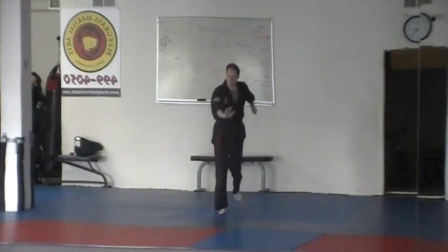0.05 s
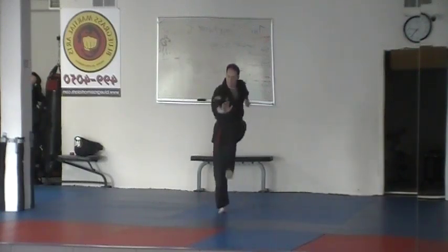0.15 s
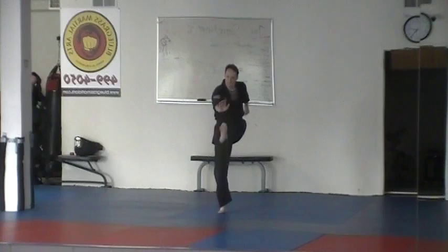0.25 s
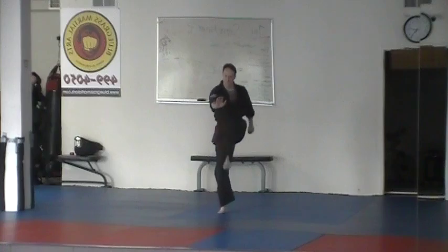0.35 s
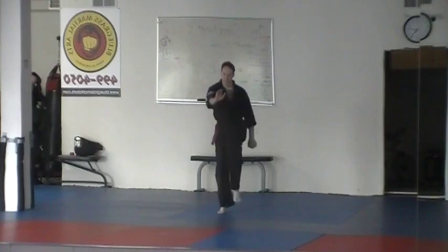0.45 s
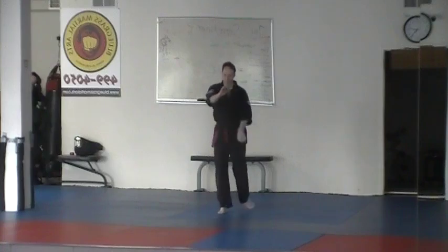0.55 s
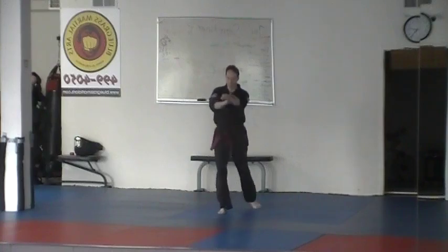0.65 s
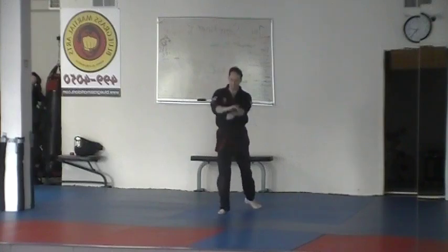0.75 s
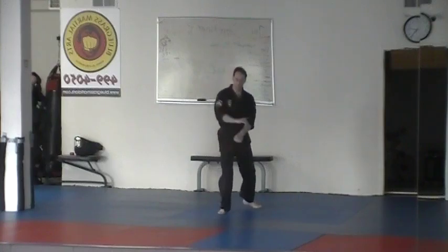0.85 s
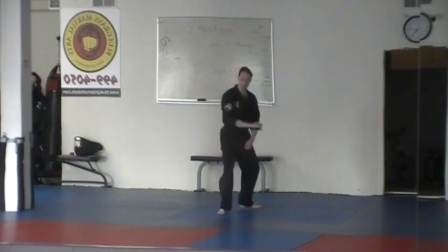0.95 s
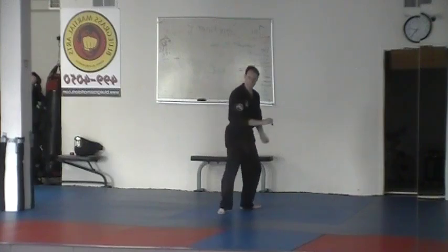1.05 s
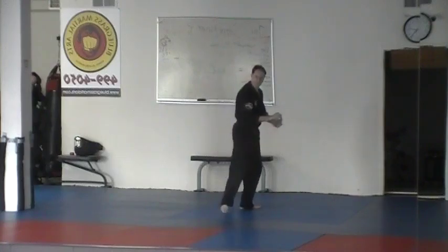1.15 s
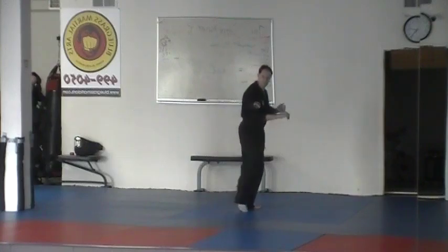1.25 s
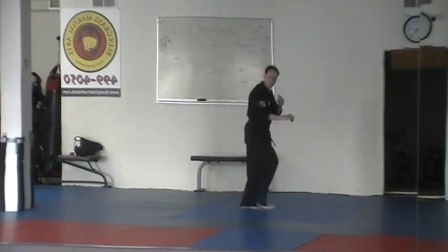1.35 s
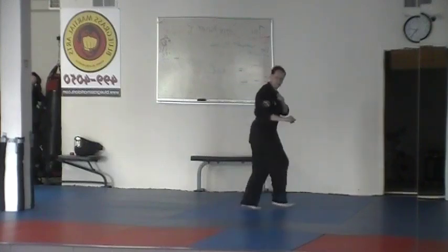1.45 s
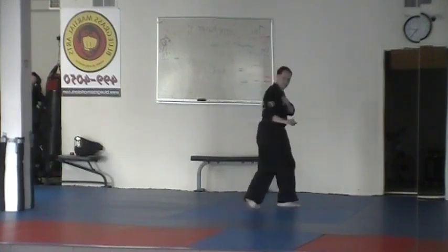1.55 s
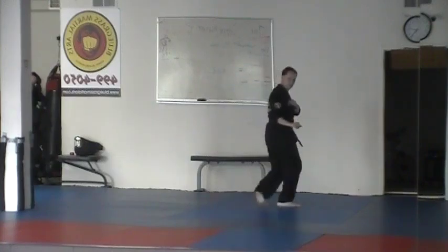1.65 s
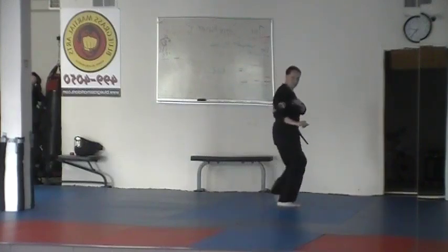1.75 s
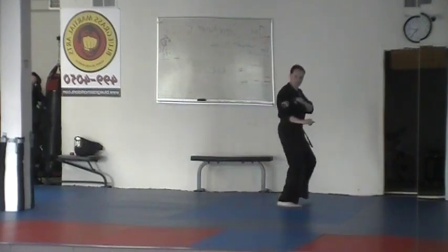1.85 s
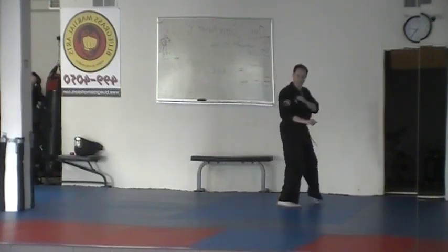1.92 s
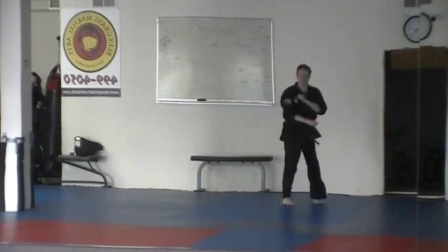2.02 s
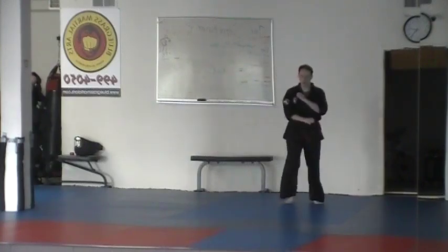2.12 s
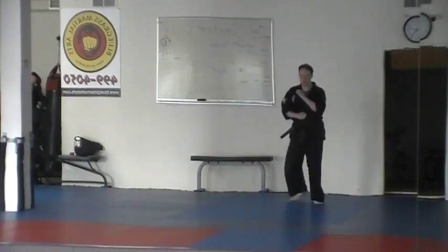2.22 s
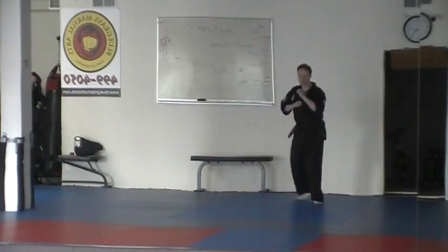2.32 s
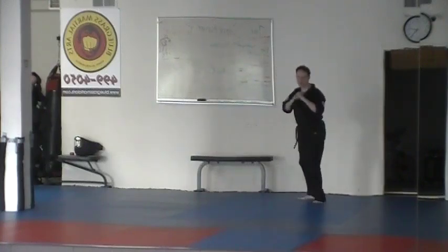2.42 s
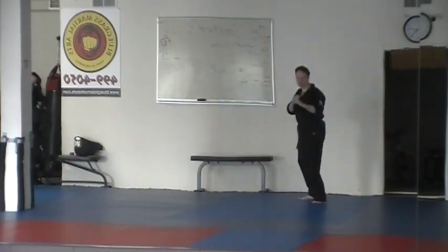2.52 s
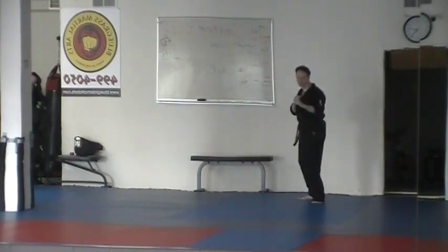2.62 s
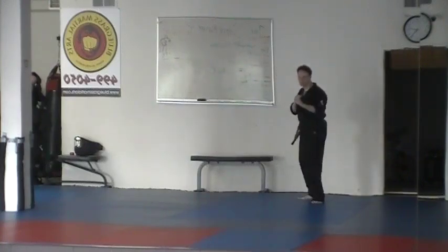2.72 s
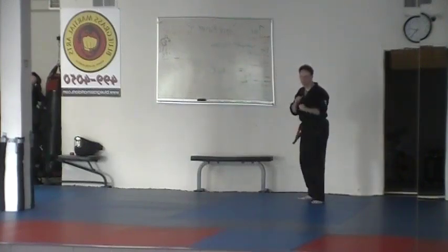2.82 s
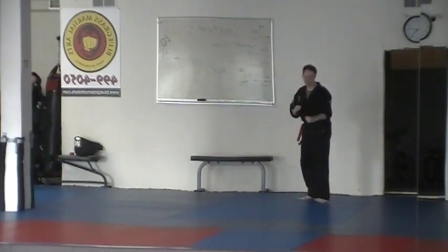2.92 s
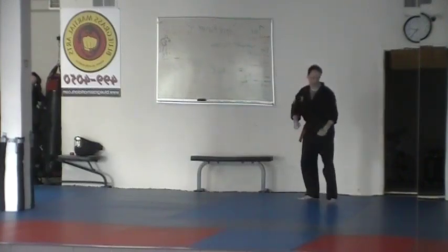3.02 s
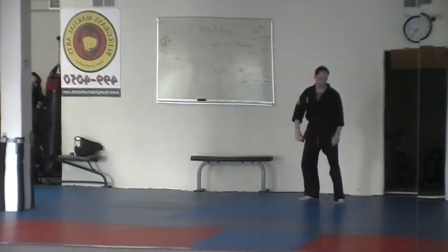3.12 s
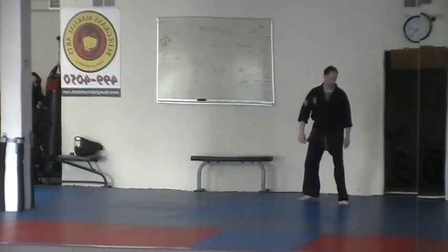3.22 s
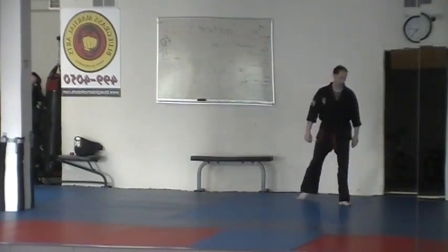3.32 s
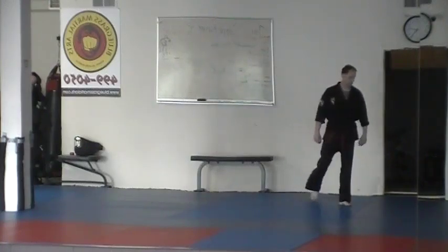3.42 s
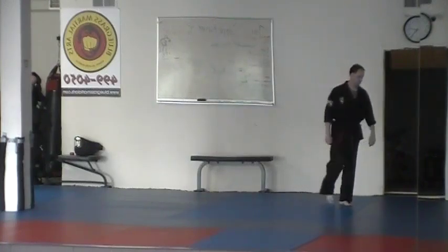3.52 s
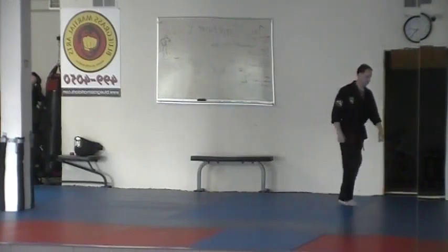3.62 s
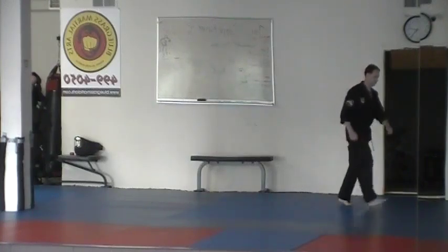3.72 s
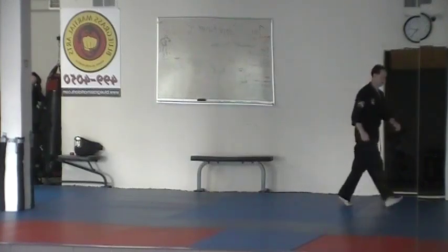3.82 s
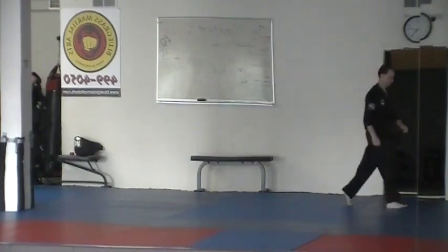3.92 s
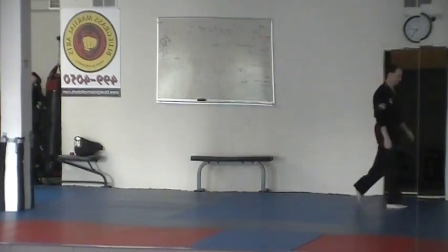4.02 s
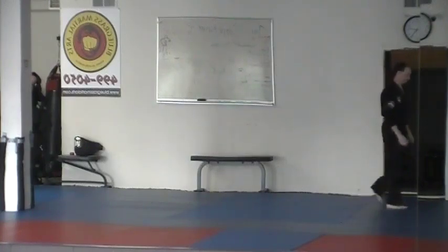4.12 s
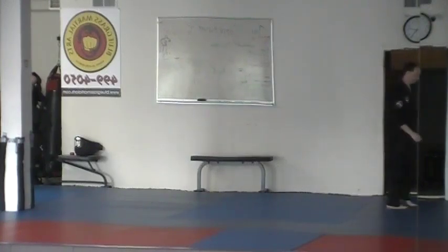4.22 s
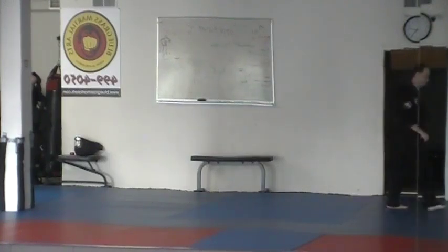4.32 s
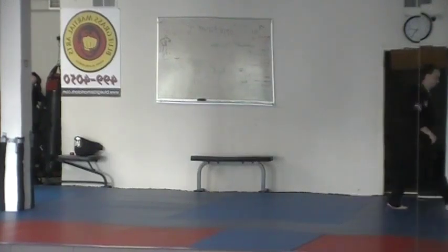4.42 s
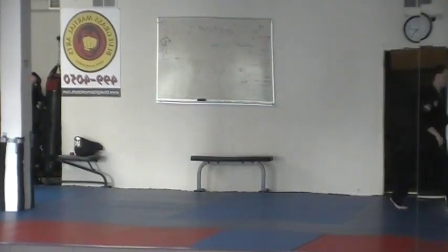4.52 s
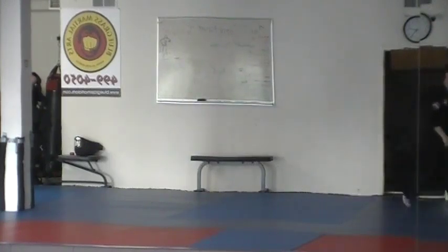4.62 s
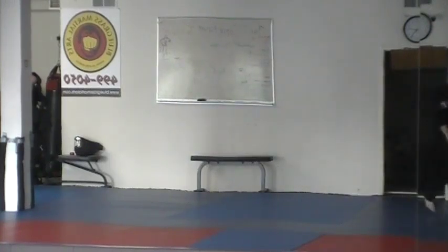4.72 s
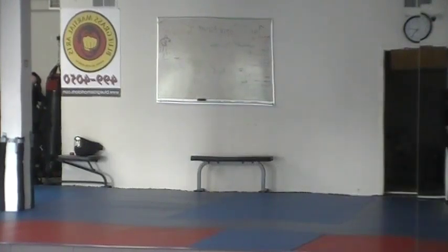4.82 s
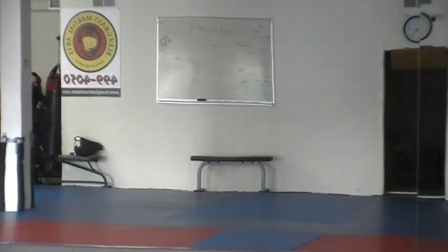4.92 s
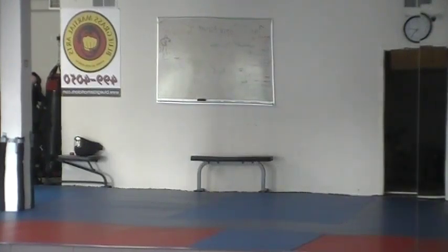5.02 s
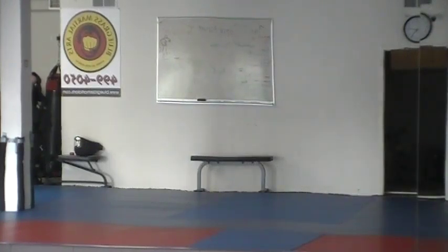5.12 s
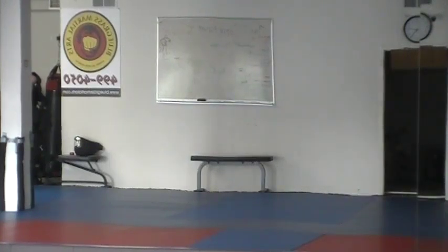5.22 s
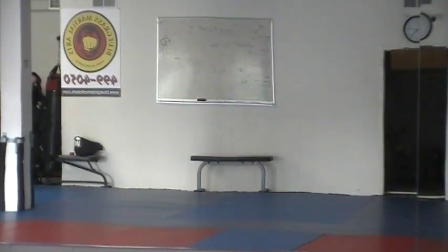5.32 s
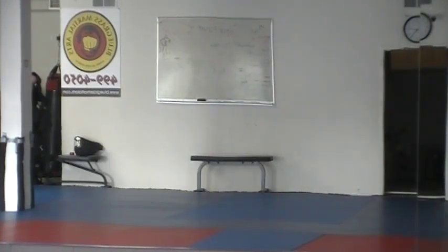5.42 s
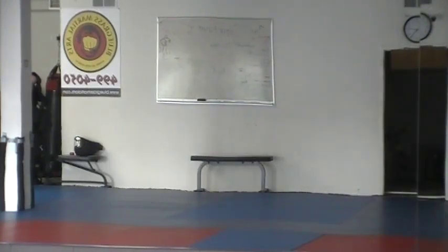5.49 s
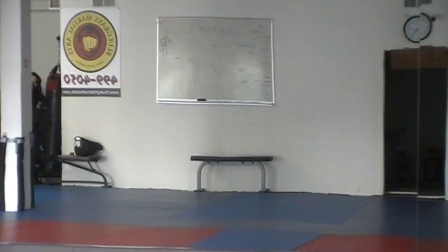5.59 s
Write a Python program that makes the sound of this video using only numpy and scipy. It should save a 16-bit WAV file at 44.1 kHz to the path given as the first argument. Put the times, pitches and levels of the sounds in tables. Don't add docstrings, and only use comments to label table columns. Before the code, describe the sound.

A barefoot fighter moves on foam mats in a reverberant hard-walled hall, far from a small, bass-light microphone. Soft thuds and faint scuffs lead to one very sharp slap, which bounces off the walls. Bright, hissing sole slides follow, with brief squeaks and cloth flaps, then a second strong double scuff. Sparse light steps, ticks and peeling skin trail off over steady ventilation hum.

```python
import sys
import numpy as np
from scipy import signal
from scipy.io import wavfile
from scipy.ndimage import uniform_filter1d

SR = 44100
rng = np.random.default_rng(int(sys.argv[2]) if len(sys.argv) > 2 else 0)


def level_to_linear(level):
    exponent = np.asarray(level, float) / 20
    return 10 ** exponent


def store_wav(level_fs):
    pcm = np.round(np.clip(np.atleast_2d(level_fs), -1, 1) * 32767)
    wavfile.write(sys.argv[1], SR, pcm.T.astype(np.int16))


N = 249284


def evened(x):
    return x / np.sqrt(np.mean(x ** 2) + 1e-20)


def smoothed_twice(x, first, second, axes=(0, 0)):
    return uniform_filter1d(uniform_filter1d(x, first, axes[0]), second, axes[1])


def highpass(x, order, hz):
    return signal.sosfilt(signal.butter(order, hz, "high", fs=SR, output="sos"), x)


def read(points, hz, column=1):
    points = np.array(points)
    return np.interp(np.log(hz + 1), np.log(points[:, 0] + 1), points[:, column])


def add(mix, s, sound):
    part = mix[round(s * SR):][:len(sound)]
    part += sound[:len(part)]


def colour(x, points):
    log_gain = np.log(level_to_linear(read(points, abs(np.fft.fftfreq(4096, 1 / SR)))))
    taps = np.fft.ifft(np.exp(np.conj(signal.hilbert(log_gain)))).real[:2048]
    return signal.oaconvolve(x, taps / np.linalg.norm(taps))[:N]


def resonate(x, hz, width):
    turn = np.exp(2j * np.pi * hz * np.arange(len(x)) / SR)
    r = np.exp(-np.pi * width / SR)
    return 2 * (turn * signal.lfilter([1 - r], [1, -r], x / turn)).real


def grit(spread_db, flicker_db):
    slips = rng.standard_normal(N) * level_to_linear(spread_db * np.minimum(rng.exponential(1, N), 5))
    flicker = evened(smoothed_twice(rng.standard_normal(N), 200, 200))
    return evened(slips * level_to_linear(flicker_db * flicker))


def swells(rows, follows=1, offsets_db=0):
    swell_db = 20
    touch, lift = 0.8, 1.44
    t, power = np.arange(0, N, 32) / SR, 0
    for (s, db, rise, fall, _), offset_db in zip(rows, offsets_db + np.zeros(len(rows))):
        before = t < s
        away = np.where(before, (s - t) / max(rise, .002), (t - s) / max(fall, .002))
        off_mat = np.maximum(away - np.where(before, touch, lift), 0) * np.where(before, 8, 1.5)
        power = power + level_to_linear(db + offset_db - swell_db * (follows * away + off_mat)) ** 2
    return np.interp(np.arange(N) / SR, t, np.sqrt(power))


def air():
    # (frequency [Hz], level [dB])
    air_spectrum = [(30, -63), (60, -39), (100, -20.5), (160, -16), (230, -11.5), (400, -4.5), (700, -6.5),
                    (1000, -8), (2000, -10), (3000, -14.5), (6000, -18), (10000, -18), (13000, -22),
                    (16000, -29.5)]
    # (frequency [Hz], level [dB], width [Hz])
    fan_tones = [(119.6, -82.5, 4.4), (204.5, -78, 6), (238.4, -72, 22), (396.2, -68, 2), (791, -80, 18),
                 (835, -71.5, 6.5), (966, -70, 1.1)]
    hz = np.fft.rfftfreq(1024, 1 / SR)
    a, b, patches = rng.standard_normal((N // 256 + 5, 513, 3)).T
    patches = evened(smoothed_twice(patches, 12, 14, (0, 1)))
    z = (a + 1j * b) * level_to_linear(read(air_spectrum, hz)[:, None] + 1.37 * patches)
    out = level_to_linear(-56.5) * evened(signal.istft(z, nperseg=1024, noverlap=768)[1][:N])
    noise = rng.standard_normal(N)
    for hz, db, width in fan_tones:
        steady = 2.6 * np.sin(2 * np.pi * hz * np.arange(N) / SR)
        out += level_to_linear(db) * evened(evened(resonate(noise, hz, width)) + steady)
    return out


def hall(x):
    # (delay [s], level [dB])
    walls = [(.009, -21), (.0108, -23), (.0165, -25), (.0195, -29), (.0255, -27), (.0345, -26),
             (.0395, -27), (.043, -27), (.046, -31), (.058, -27), (.0655, -29), (.076, -33), (.102, -34)]
    # (frequency [Hz], time to fall by 60 dB [s], level [dB])
    fading = [(200, 0.9, -12), (800, 0.25, 1), (1400, 0.8, -8), (3300, 0.88, 1), (5400, 0.86, -3.5),
              (8500, 0.73, 1), (12900, 0.67, -12.5), (16500, 0.52, -9.5)]
    hz, t, z = signal.stft(rng.standard_normal(SR), SR, nperseg=256)
    tail = signal.istft(z * level_to_linear(-60 * t / read(fading, hz)[:, None]), SR, nperseg=256)[1][:SR]
    tail *= np.clip(np.arange(SR) / SR / 0.041, 0, 1) ** 1.2
    tail *= level_to_linear(-14.5) / np.linalg.norm(tail)
    smears = rng.standard_normal((14, 300)) * np.exp(-np.arange(300) / 60.)
    for (s, db), smear in zip(walls, smears):
        add(tail, s, level_to_linear(db + 2.5) * smear / np.linalg.norm(smear))
    return signal.fftconvolve(x, colour(tail, [(f, db) for f, t60, db in fading]))[:N]


def squeaks():
    # (time [s], peak level [dB], slip rate [Hz], length [ms])
    squeak_events = [(.076, -46.5, 2270, 19), (.098, -47, 2040, 17), (.215, -47.5, 1890, 13),
                     (1.616, -41.5, 2926, 4.7), (1.636, -34.5, 2180, 13.6), (1.655, -37, 2260, 9),
                     (1.658, -46.5, 3110, 32), (1.676, -45, 2120, 15), (1.694, -54, 2220, 9.9),
                     (1.637, -40, 4350, 9.9), (1.652, -51, 4330, 8.6), (1.694, -50, 4500, 10),
                     (1.618, -48, 2570, 12), (3.52, -55, 5310, 37), (3.562, -49.5, 5700, 28),
                     (3.925, -51, 2250, 12), (5.485, -56, 2500, 40), (5.5, -52, 8500, 40)]
    out = np.zeros(N)
    for (s, db, hz, length_ms), noise in zip(squeak_events, rng.standard_normal((20, 2000))):
        waver = 1 + 0.03 * evened(uniform_filter1d(noise, 60))[:round(length_ms * SR / 1000)]
        turns = np.cumsum(hz * waver) / SR
        tone = sum(level_to_linear(-9 * k) * np.sin(2 * np.pi * (k + 1) * turns) for k in range(3))
        add(out, s, level_to_linear(db) * tone * np.hanning(len(turns)))
    return out


def thuds():
    # (time [s], peak level [dB], pitch
    # [Hz], decay [ms])
    landings = [(0.11, -35, 713, 8.6), (0.209, -40.5, 514, 13), (1.924, -33.5, 368, 4.4),
                (2.302, -42.5, 434, 27), (2.33, -44, 472, 4.1), (3.349, -40, 386, 5.4),
                (3.907, -38.5, 415, 6.6), (4.1967, -37, 940, 6.3), (4.524, -36, 420, 4.6),
                (4.565, -29.5, 700, 2.6), (5.025, -48, 482, 11), (5.09, -44, 500, 2.7),
                (5.098, -28.5, 448, 3), (5.192, -47.5, 400, 8),
                (.128, -38, 800, 3.3), (.147, -42, 690, 4), (.168, -41.5, 478, 8), (2.345, -52, 385, 8.7),
            (4.53, -29, 1980, 1.9), (4.567, -45, 534, 8.4), (5.089, -29.5, 1810, 2.5),
            (5.098, -38, 1900, 1.5), (5.105, -35, 1680, 2.3), (5.114, -40, 1400, 3.1), (5.13, -54, 522, 11),
            (.222, -42, 565, 10), (4.526, -48, 376, 9)]
    # (strongest [s], rumble level [dB], rise [s], fall [s], flap over rumble [dB])
    shifts = [(0.002, -42, 0.011, 0.01, -6), (.11, -54.5, 0.4, 0.24, 5), (.212, -53, 0.053, 0.12, 2),
              (.43, -69, 0.55, 0.67, 10), (0.641, -55.5, 0.14, .003, 2.5), (1.1, -63.5, 0.24, 0.78, 6.5),
              (1.33, -48, 0.43, 0.3, -6), (1.388, -56.5, 0.081, 0.035, 17), (1.526, -55.5, 0.034, 0.4, 0),
              (1.95, -57, 0.041, 0.17, 3), (2.134, -54.5, 0.21, 0.2, -17), (2.304, -48, .006, 0.19, -18),
              (2.345, -49.5, 0.069, 0.043, -1.5), (2.42, -56, 0.204, 0.099, -0.5),
              (3.36, -59.5, 0.23, 0.34, 0.5), (3.914, -53.5, 0.12, 0.075, -2),
              (4.55, -54.5, 0.038, 0.099, 2), (4.716, -60, 0.068, 0.055, -15),
              (5.1, -50, 0.013, 0.064, 1.5), (5.2, -69, 0.26, 0.16, 10)]
    # (frequency [Hz], level [dB])
    foam = [(80, -44), (200, -28), (290, -6.5), (400, 0.5), (500, -2), (650, -13.5), (1000, -41)]
    # (frequency [Hz], level [dB])
    cloth = [(300, -41.5), (600, -3), (850, -2), (1300, -1), (1800, -3.5), (3000, -19.5)]
    drive = level_to_linear(-2.5) * grit(spread_db=3.5, flicker_db=3.5)
    rumble = drive * swells(shifts)
    flap = drive * swells(shifts, 0.63, np.array(shifts)[:, -1])
    out = colour(rumble, foam) + colour(flap, cloth)
    u = np.arange(4000) / SR
    for (s, db, hz, decay_ms), noise in zip(landings, rng.standard_normal((30, 4000))):
        rough = resonate(resonate(noise, hz * 0.99, 0.89 * hz), hz * 0.99, 0.89 * hz)
        knock = np.cos(2 * np.pi * hz * u) + 0.48 * evened(rough)
        shape = (1 - np.exp(-u / 0.0008)) ** 2 * np.exp(-u * 1000 / max(decay_ms, 1))
        add(out, s - .0015, level_to_linear(db - 3) * knock * shape)
    return highpass(out, 2, 190)


def rubbing():
    # (fastest [s], fizz level [dB], rise
    # [s], fall [s], weight on the sole [dB])
    slides = [(0.002, -47.5, 0.011, 0.46, -5.5), (.226, -48, 0.055, 0.12, -4),
              (.612, -56.5, 0.64, 0.022, -6), (.648, -40.5, 0.028, 0.0069, -5),
              (1.17, -40, .017, 0.28, -15), (1.295, -22, 0.12, 0.26, -22.5),
              (1.37, -30.5, 0.24, 0.25, -6.5), (1.478, -32.5, 0.22, 0.16, -27),
              (1.698, -39, 0.021, 0.03, -7), (1.678, -36, 0.036, .02, -12), (1.966, -52, 0.024, 0.09, -12),
              (2.026, -42, 0.12, 0.01, -11), (2.056, -23.5, 0.019, 0.23, -11.5),
              (2.125, -20, 0.055, 0.1, -16), (2.184, -19.5, 0.15, 0.084, -23.5),
              (2.364, -36.5, 0.053, 0.16, -11),
              (2.884, -56.5, .03, .025, -7), (2.93, -55, 0.026, 0.087, -19),
               (3.38, -42.5, 0.035, 0.19, -10), (3.426, -43, 0.086, 0.059, -28),
               (3.562, -45.5, 0.092, 0.14, -13.5), (4.14, -65, 0.14, 0.2, 3), (3.74, -56, 0.067, .08, -6),
               (3.856, -56, 0.026, 0.034, -11), (3.905, -55, .01, 0.23, -2),
               (4.324, -39, 0.038, 0.077, -22), (4.346, -45, .05, 0.021, -17), (4.4, -53, 0.17, 0.28, -10),
               (4.604, -54.5, 0.011, 0.084, -8), (4.964, -34, 0.018, 0.1, -16.5),
               (5.104, -49.5, 0.028, 0.29, -5.5), (5.25, -56, 0.22, 0.052, -21),
               (5.48, -49, 0.018, 0.041, -4), (5.502, -53, .01, 0.25, -9)]
    # (time [s], peak level [dB], rasp over peak [dB], dull part over peak [dB], length [ms])
    scuffs = [(0.2085, -54, 2, -3, 15), (1.0436, -50, -5, -4, 65), (1.152, -46, -19, -18, 18),
              (1.368, -36, -22, 2, 13), (1.619, -36, -3, -3, 16), (1.638, -34.5, 2.5, 0, 9),
              (1.9218, -42, -6.5, -7.5, 20), (1.961, -39.5, -35, -16, 13), (2.006, -38, -9, -12, 14),
              (2.1309, -19, -2.5, -15, 11), (2.3155, -32, -5, -12.5, 32), (2.416, -43.5, -1, 1, 9.6),
              (2.8735, -56, -13, -4, 15), (2.935, -44, -16, -17, 9.2), (3.523, -57, 8.5, -20, 51),
              (3.555, -55, 6, -24, 20), (4.2192, -43, -8, -4, 7.4), (4.248, -46, -15, -14, 8),
              (4.271, -33.5, -2.5, -8.5, 18), (4.282, -33, -8, -19, 20), (4.9151, -32, -6, -5.5, 21),
              (4.929, -30.5, -8.5, -13, 21), (5.459, -32, -6, -5, 7.5), (5.5015, -37, -16, -20, 6)]
    # (time [s], peak level [dB], rasp
    # over peak [dB], dull part over peak [dB], length [ms])
    ticks_and_peels = [(1.1535, -37, -12, -16, 2), (2.461, -42, -12, -18, 3), (3.0295, -46, -12, -12, .3),
                       (3.2258, -52, 12, 15, .2), (3.3494, -37, -10, -6, .3), (3.8412, -31, -9, -13, .2),
                       (3.9056, -35, -3, 1, .4), (3.917, -37, -5, -12, .4), (4.003, -44, -10, -10, .3),
                       (4.4642, -49, 6, 0, .5), (4.5232, -37, 8, 14, .3), (4.5282, -36, -12, -5, .3),
                       (4.531, -48, 2, 12, .4), (4.538, -49, 6, 6, .4), (4.5585, -43, -8, -10, 1.2),
                       (4.5632, -28, -22, -13, .9), (4.606, -41, -14, -14, .4), (5.029, -54, -6, 8, 1.5),
                       (5.0878, -33.5, -2, -5, 2), (5.0968, -22, -5, -3, .3), (5.105, -43, 2, 3, .6),
                       (5.113, -42, 0, 2, .6), (5.139, -36, -10, -12, .4),
                       (1.371, -43, 0, 17, 2.2), (1.377, -51, 0, 10, 2.2), (2.018, -36, -17, -17, 17),
             (2.04, -35, 0, -12, 16), (2.973, -49.5, -16, -18, 10), (3.21, -54, -14, -18, 5),
             (3.3545, -36, -14, -13, .2), (3.365, -48, -10, -16, 8), (3.522, -50, -10, -20, 20),
             (3.5668, -29, -10, -16, .2), (4.221, -48, -6, -8, 1), (2.1318, -29, -8, -14, 0.56),
             (3.817, -44, -8, -14, .3), (3.843, -42.5, -3.5, -9, 5.2), (3.866, -50, -14, -16, 7),
             (3.884, -46, -10, -16, 8.7), (3.907, -46, -2, -8, 4), (3.919, -49, 4, -10, 5.3),
             (3.948, -50, -8, -16, 5), (4.004, -49.5, -2, -5, 5), (4.025, -51, -10, -16, 3),
             (4.046, -54, -10, -16, 6), (4.549, -47, -17, -15, 1.7), (4.565, -44, -7, -9, 12),
             (4.957, -41, -16, -20, 8), (4.976, -35, -20, -18, 14), (5.002, -44, -14, -22, 12),
             (5.467, -38.5, 0.5, -11, 3), (5.511, -42, -2, -18, 2)]
    # (frequency [Hz], level [dB])
    fizz = [(3000, -56), (5500, -18), (7000, -4), (8500, 6), (10000, 9), (12000, 6), (13500, 0),
            (16000, -10.5), (17000, -20)]
    # (frequency [Hz], level [dB])
    rasp = [(1500, -49.5), (3000, -14.5), (4300, -3), (5500, -1.5), (7000, -2), (9000, -22.5), (13000, -42)]
    # (frequency [Hz], level [dB])
    drag = [(100, -27), (500, -11.5), (900, 1.5), (1500, 8.5), (2300, 14.5), (3500, 11), (4800, -5),
            (8000, -42)]
    rows = slides
    slips = grit(spread_db=2.0, flicker_db=-1.2)
    weight_db = np.array(rows)[:, -1]
    layers = level_to_linear(-3.5) * slips * np.array([
        swells(rows),
        swells(rows, 0.99, -3.5 + 0.4 * weight_db),
        swells(rows, 1, weight_db)])
    u = np.arange(4000) / SR
    bursts = rng.standard_normal((90, 4000))
    for (s, db, rasp_db, dull_db, length_ms), burst in zip(scuffs + ticks_and_peels, bursts):
        length = max(length_ms, .1) / 1000
        shape = (1 - np.exp(-u / 0.0005 - .2)) * np.exp(-(u / length) ** 3)
        burst = burst / np.linalg.norm(burst * shape) * np.linalg.norm(shape) * shape / shape.max()
        burst[0] = 4.7 / (1 + length_ms) ** 2
        for layer, extra_db in zip(layers, (0, rasp_db, dull_db)):
            add(layer, s, level_to_linear(db + extra_db - 6.5) * burst)
    return sum(colour(layer, points) for layer, points in zip(layers, (fizz, rasp, drag)))


def slap():
    # (time [s], level [dB])
    cracks = [(.65272, -13), (.6531, -19), (.6534, -18), (.65383, -4), (.65418, -1), (.65436, -4),
              (.65471, -9), (.6554, -19), (.65715, -5), (.6577, -13), (.6581, -18)]
    # (frequency [Hz], level [dB])
    palm = [(100, -45), (400, -49), (800, -5), (1250, -10.5), (3000, 0.5), (4500, -6.5), (6000, -4.5),
            (9500, -1), (11400, -2), (13000, -12), (16000, -24)]
    # (frequency [Hz], level [dB])
    palm_around = [(300, -28), (800, -12), (1300, -24), (1800, -6.5), (3200, -6.5), (4900, -8), (6400, -1),
                   (9000, -2.5), (11000, 2), (14000, -1), (16000, -25)]
    clicks, bounced, around = np.zeros((3, N))
    u = np.arange(400) / SR
    first, closing = cracks[0][0], cracks[3][0]
    for s, db in cracks:
        add(clicks if s < first + .003 else bounced, s, [-level_to_linear(db)])
    fingers = rng.standard_normal(400) * np.exp(-u / 0.0052)
    add(bounced, cracks[-1][0], level_to_linear(-31) * fingers)
    skin = rng.standard_normal(400) * np.exp(-u / .0008)
    add(clicks, closing, level_to_linear(-18) * skin)
    clicks += highpass(bounced, 2, 1900)
    direct = level_to_linear(3.9) * colour(clicks, palm)
    add(direct, first, level_to_linear(-23.5) * np.sin(2 * np.pi * 700 * u) * np.exp(-u / 0.0018))
    add(direct, closing, level_to_linear(-30.5) * np.sin(2 * np.pi * 1380 * u) * np.exp(-u / 0.0031))
    add(around, cracks[4][0], [level_to_linear(16.5)])
    around = colour(around, palm_around)
    cupped = resonate(around, 3000, 530)
    return direct, around + level_to_linear(-1) * cupped


def scene():
    feet = rubbing() + thuds() + squeaks()
    direct, around = slap()
    return (feet + direct + hall(feet + around) + air())[None]


def roll_off(x):
    return signal.sosfilt(signal.butter(12, 16860, fs=SR, output="sos"), x)


def record(dry):
    dry = highpass(dry, 1, 120)
    treble_edge = signal.firwin(511, 15880, window=("kaiser", 4), fs=SR)
    dry = signal.oaconvolve(dry, treble_edge[None], "same")
    power_db = 10 * np.log10(abs(signal.lfilter([.02], [1, -.98], dry[0] ** 2)) + 1e-12)
    fall = np.arange(N) * 14.0 / SR
    over_db = np.maximum(np.maximum.accumulate(power_db + fall) - fall + 19.5, 0)
    late_db = np.roll(signal.lfilter(np.ones(200) / 200, 1, over_db), 130)
    squeeze = .8
    return roll_off(dry / level_to_linear(squeeze * late_db))


dry = scene()
out = record(dry)
store_wav(out)
```